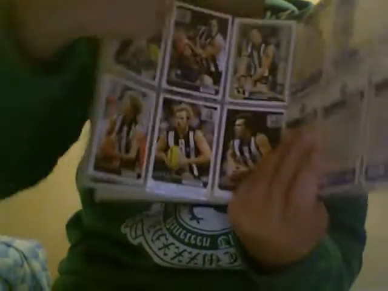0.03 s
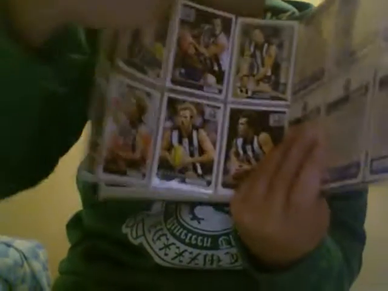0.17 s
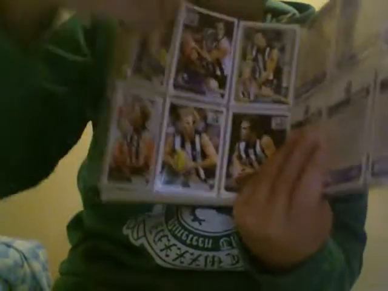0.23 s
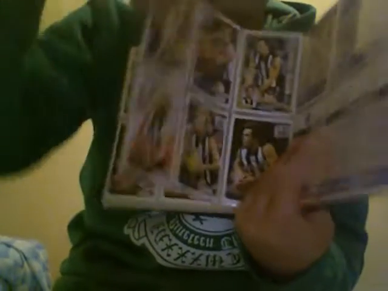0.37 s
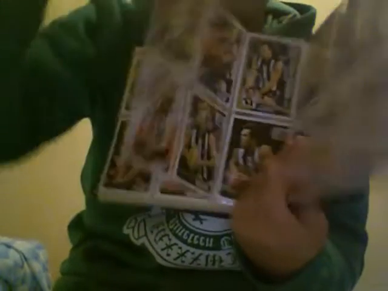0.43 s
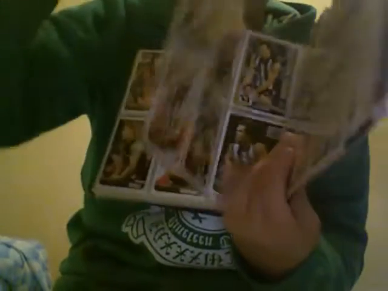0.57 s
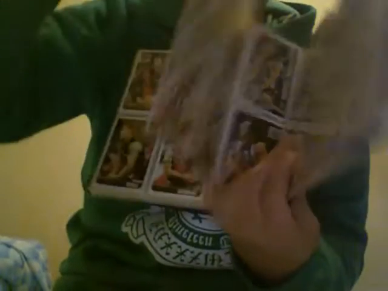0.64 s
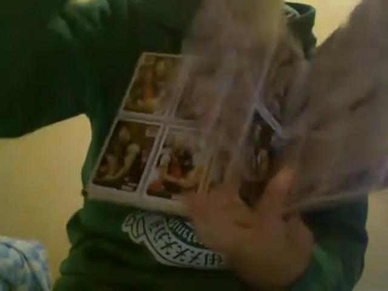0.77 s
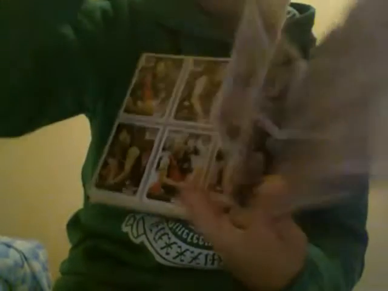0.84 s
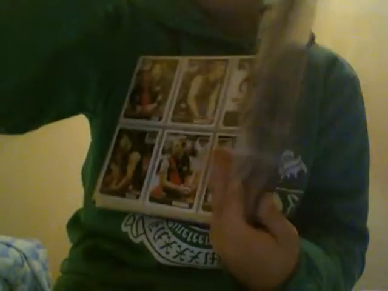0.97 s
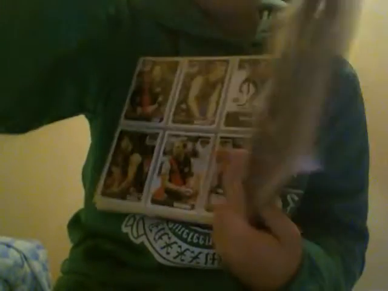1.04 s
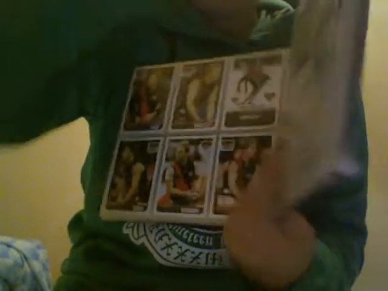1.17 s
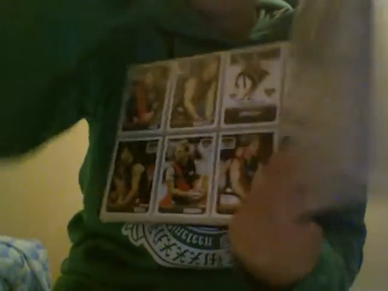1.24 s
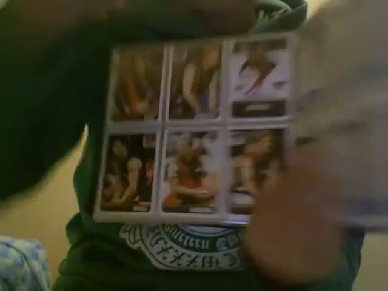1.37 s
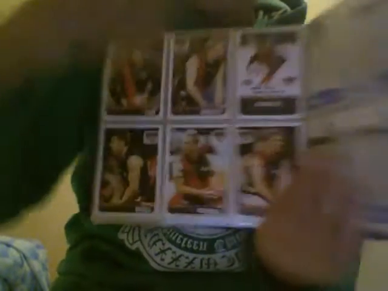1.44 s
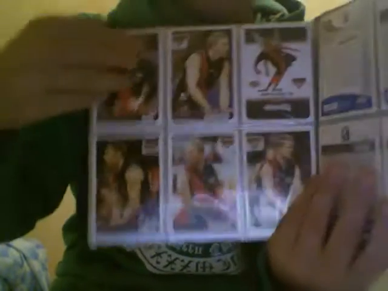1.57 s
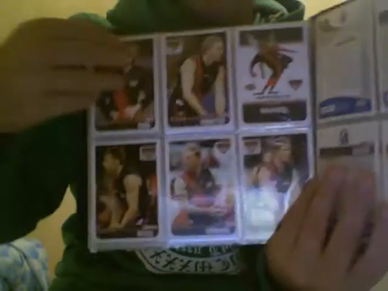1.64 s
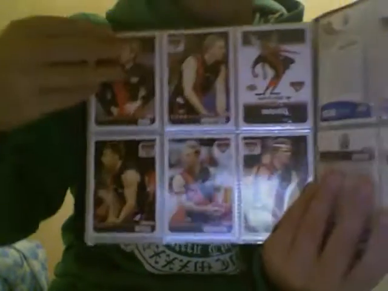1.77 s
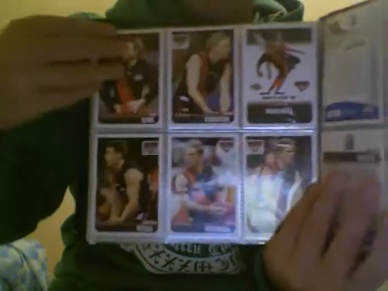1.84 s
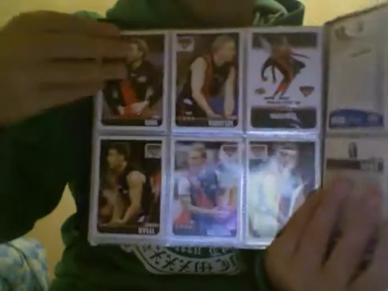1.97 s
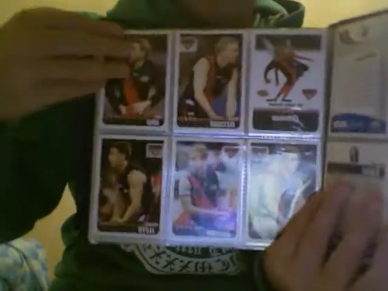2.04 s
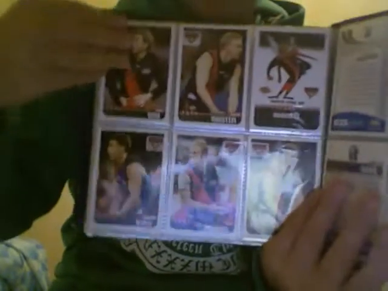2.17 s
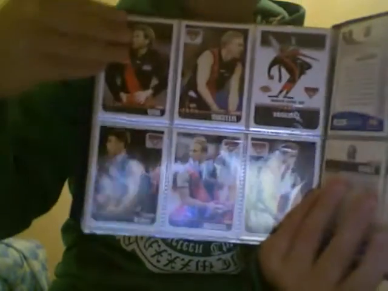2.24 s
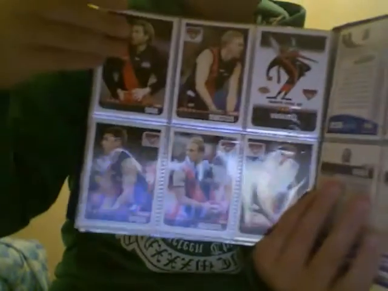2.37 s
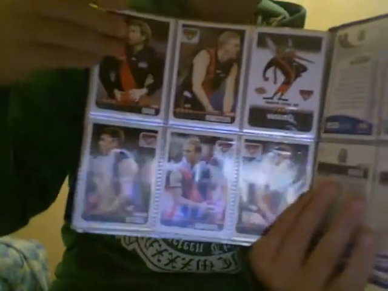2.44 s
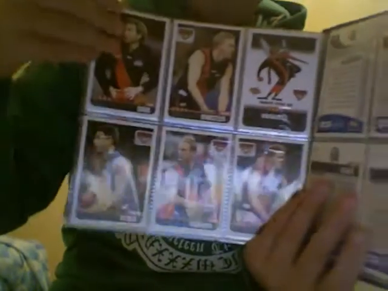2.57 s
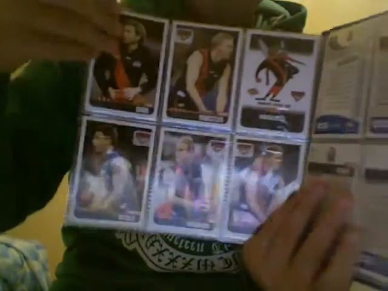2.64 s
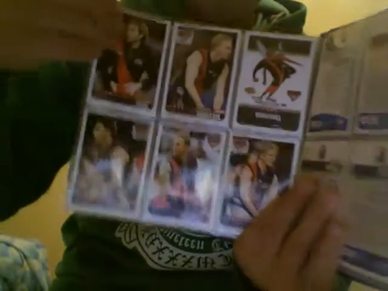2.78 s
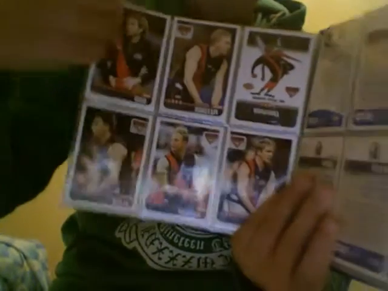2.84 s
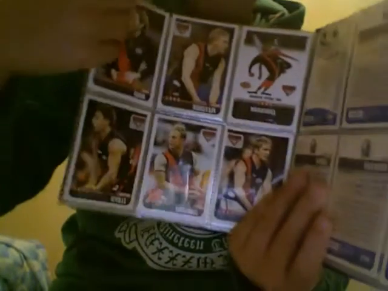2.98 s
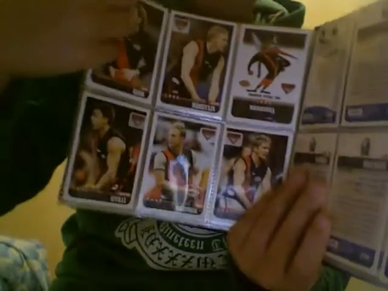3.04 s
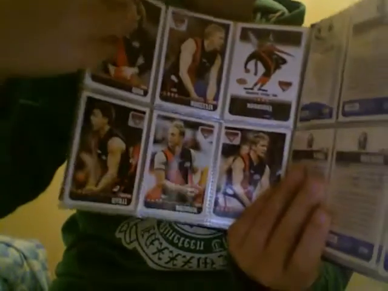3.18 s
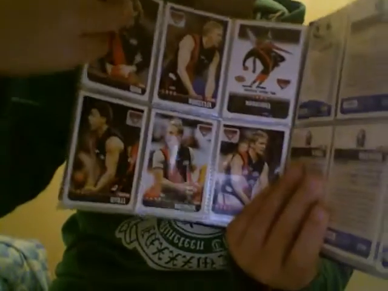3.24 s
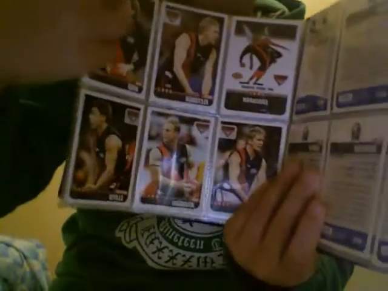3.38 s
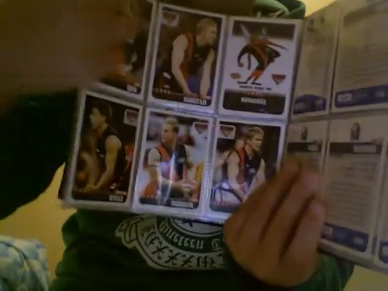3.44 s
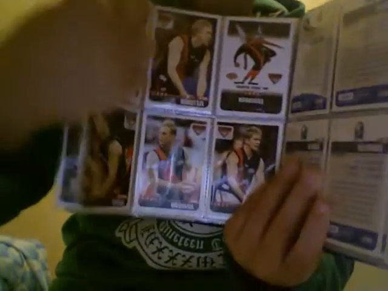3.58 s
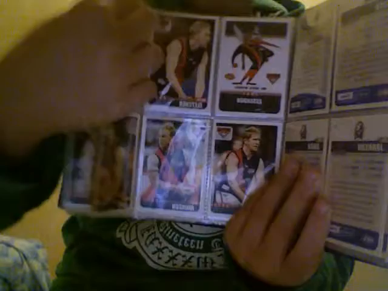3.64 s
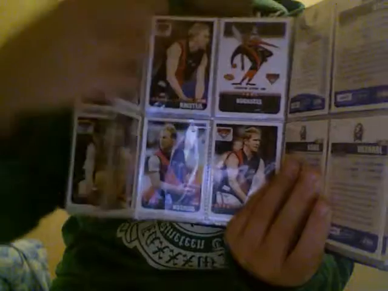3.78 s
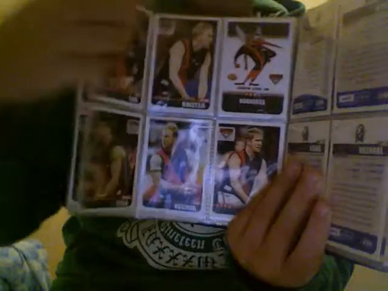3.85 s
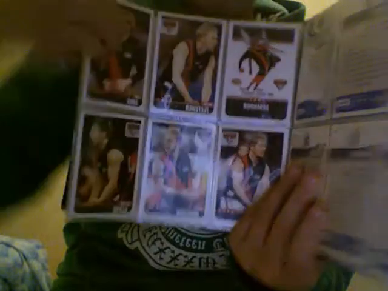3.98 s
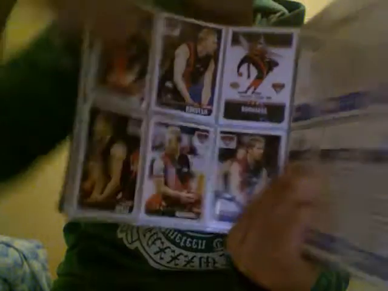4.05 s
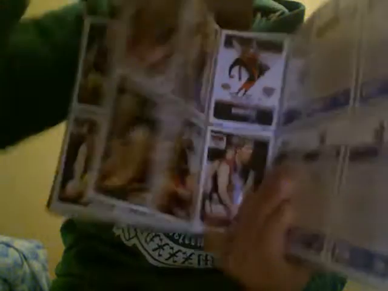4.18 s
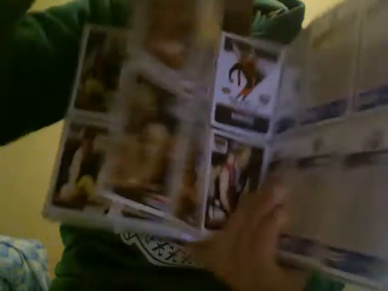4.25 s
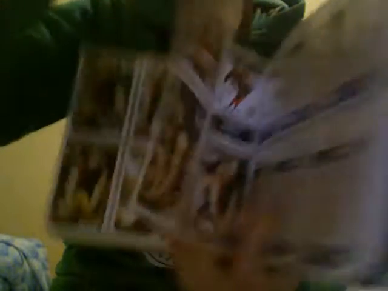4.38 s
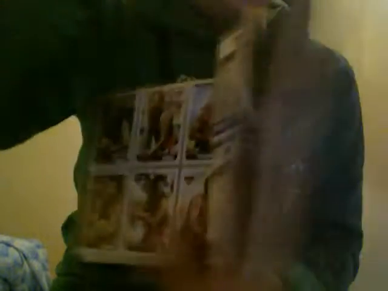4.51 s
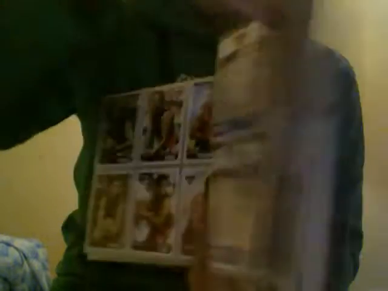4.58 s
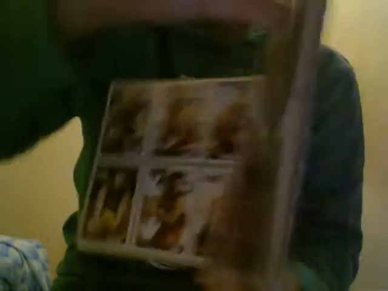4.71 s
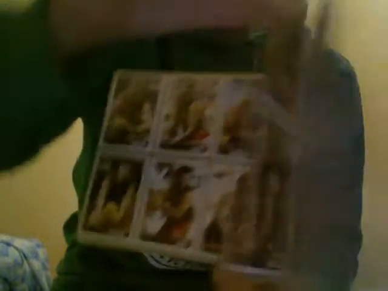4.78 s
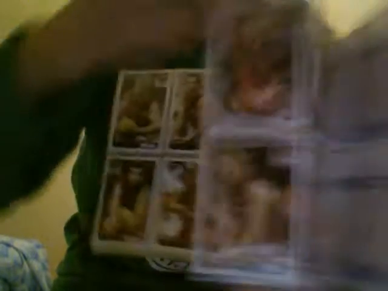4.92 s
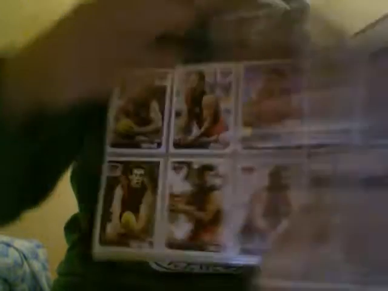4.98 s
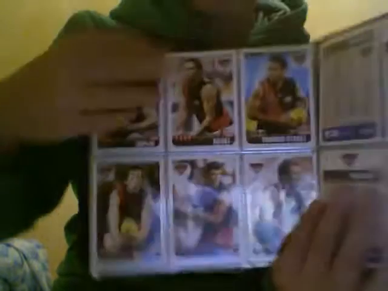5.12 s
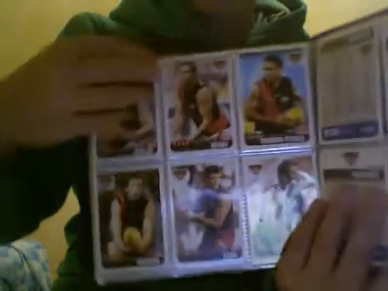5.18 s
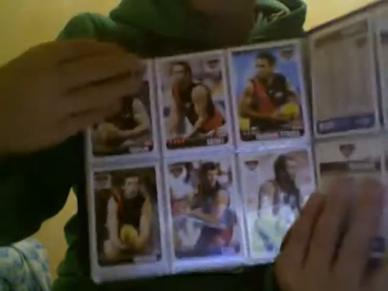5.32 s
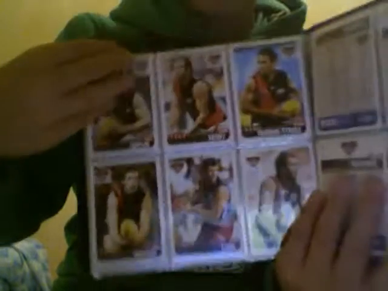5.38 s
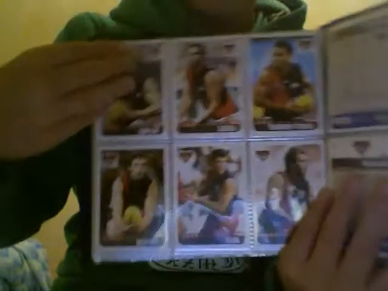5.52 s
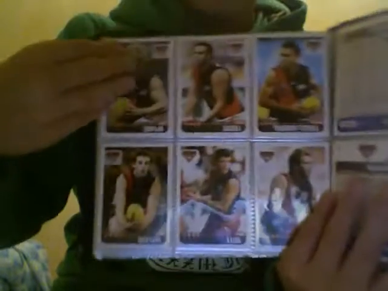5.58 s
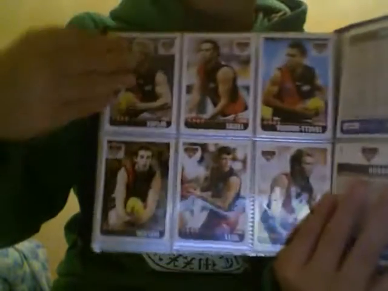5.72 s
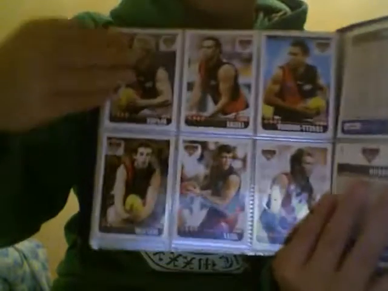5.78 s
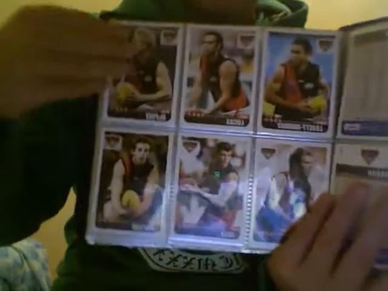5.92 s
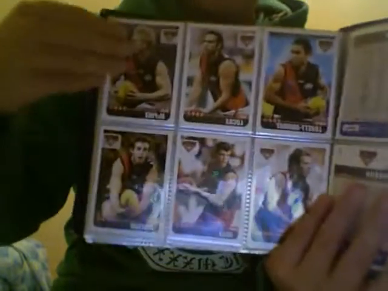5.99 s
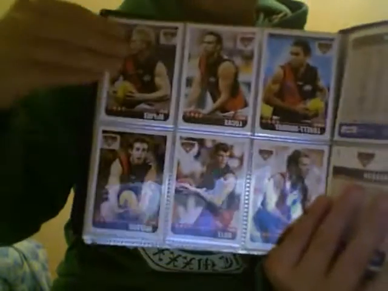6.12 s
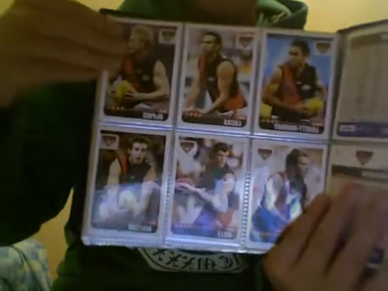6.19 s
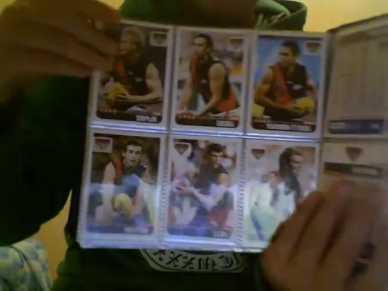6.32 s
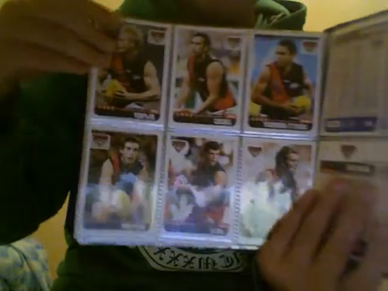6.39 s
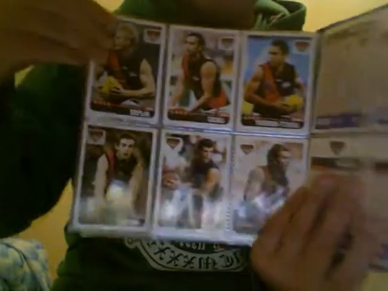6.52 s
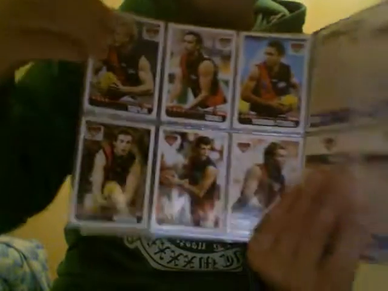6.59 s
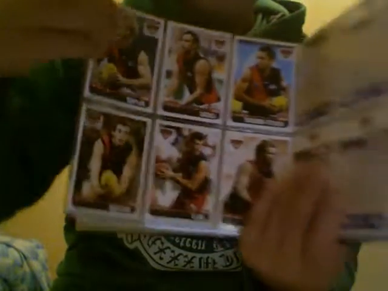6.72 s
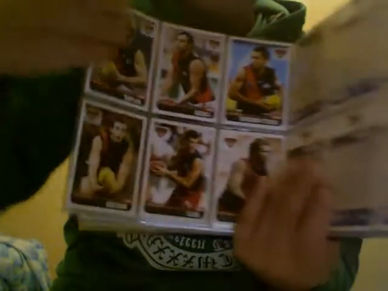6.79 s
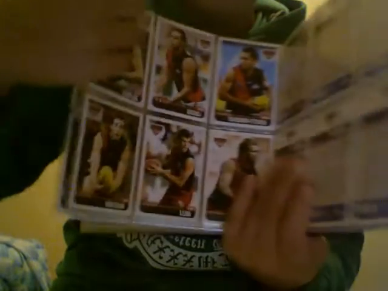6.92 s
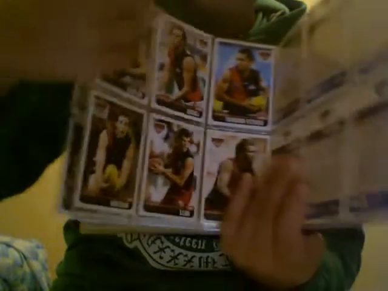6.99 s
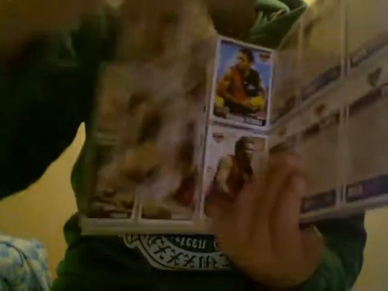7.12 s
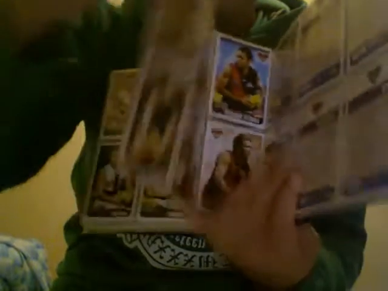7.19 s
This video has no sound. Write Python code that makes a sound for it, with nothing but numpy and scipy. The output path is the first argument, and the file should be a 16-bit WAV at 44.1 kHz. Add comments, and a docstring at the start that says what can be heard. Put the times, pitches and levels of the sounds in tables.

```python
"""Plastic sleeve pages of a card album are lifted and turned close to a small mono camera in a quiet room.
The stiff film snaps as it buckles and crackles as it rubs; swinging pages push air, a hand nudges the album.
Traffic drones far outside from halfway on. Under it all lie room rumble, microphone hiss
and a thin whine from the camera's electronics that pulses with every picture."""
import sys
import numpy as np
from scipy import signal
from scipy.fft import rfft, irfft, next_fast_len
from scipy.io import wavfile
from scipy.ndimage import uniform_filter1d

SR = 44100
rng = np.random.default_rng(int(sys.argv[2]) if len(sys.argv) > 2 else 0)


def to_wav(sig):
    """Store sig (one row per channel, or 1-D mono) as 16-bit WAV at the path in sys.argv[1].

    Samples outside -1..1 are clipped; the rate is SR.
    """
    pcm = np.clip(np.atleast_2d(sig), -1, 1) * 32767
    pcm = np.round(pcm).astype(np.int16)
    wavfile.write(sys.argv[1], SR, pcm.T)  # frames by channels


N = 319711


def gain_of(db):
    """Decibels to an amplitude factor."""
    return 10 ** (np.asarray(db) / 20)


def unit_rms(x):
    """Scales x to rms 1."""
    return x / np.sqrt(np.mean(x ** 2) + 1e-20)


def coloured(x, spectrum):
    """Filters x by a curve of (Hz, dB) points; rms 1."""
    size = next_fast_len(len(x))
    bin_hz = np.fft.rfftfreq(size, 1 / SR)
    hz, db = np.transpose(spectrum)
    curve = gain_of(np.interp(np.log(bin_hz + 1), np.log(hz), db))
    return unit_rms(irfft(rfft(x, size) * curve, size)[:len(x)])


def resonate(x, hz, width_hz):
    """A resonance passed twice for steep skirts; rms 1."""
    r = np.exp(-np.pi * width_hz / SR)
    stage = [1, 0, -1, 1, -2 * r * np.cos(2 * np.pi * hz / SR), r * r]
    return unit_rms(signal.sosfilt([stage, stage], x))


def wander(corner_hz):
    """Low-passed random drift; rms 1."""
    pole = np.exp(-2 * np.pi * corner_hz / SR)
    return unit_rms(signal.lfilter([1], [1, -pole], rng.standard_normal(N)))


# Noise floor spectrum. Each row: frequency in Hz, relative density in dB.
FLOOR_SPECTRUM = [(15, -11), (30, -24.5), (50, -11), (105, 0), (200, -6.5), (400, -10.5), (950, -17.5),
                  (1550, -20.5), (3000, -22), (6900, -27.5), (9000, -27), (12000, -27.5), (14000, -28.5),
                  (15700, -37), (16000, -65)]


def noise_floor(level_db=-52):
    """Steady room rumble and microphone hiss."""
    return gain_of(level_db) * coloured(rng.standard_normal(N), FLOOR_SPECTRUM)


# Clock tones. Each row: frequency in Hz, level while on in dB, 1 if the phase restarts with each picture.
CLOCK_TONES = [(8000, -54.5, 0), (11052.6, -69, 0), (15243, -68, 1)]


def camera_whine(pictures_per_s=14.978, readout_s=0.0315, start_s=-0.0022):
    """Clock tones leak in while the sensor reads out each picture."""
    t = np.arange(N) / SR
    since_s = (t - start_s) % (1 / pictures_per_s)
    gate = uniform_filter1d(1. * (since_s < readout_s), size=40)
    tones = sum(gain_of(db) * np.cos(2 * np.pi * hz * (since_s if restarts else t))
                for hz, db, restarts in CLOCK_TONES)
    return gate * np.sqrt(2) * tones


# Buckles of the film. Each row: start in seconds, relative level in dB, ring in Hz,
# thud and crack in dB against that level, time to fall 60 dB in ms.
BUCKLES = [(0.0314, -16.5, 2820, -14, -22, 6), (0.063, -26.5, 2500, -16, -15, 6.7),
           (0.0915, -23.5, 1410, -9, -26, 13), (0.0996, -24, 1510, -29, -25, 7),
           (0.122, -31, 2650, -2, -2, 6.2), (0.2623, -16, 1420, -13.5, -15, 8.1),
           (0.3232, -17, 4650, -14, -4, 3.3), (0.3303, -12, 4770, -13, -5, 11),
           (0.347, -26.5, 910, 1, -1, 17), (0.362, -29, 4930, -1, 1, 3), (0.378, -28, 1220, -5, -11, 8),
           (0.4018, -20, 2650, -5.5, 1, 2), (0.47, -19.5, 1780, -16, -32, 14),
           (0.5572, -21.5, 1730, -5, -21, 8.8), (0.5714, -24.5, 1530, -15, -25, 6.4),
           (0.6686, -21.5, 6290, -16, -11, 13), (0.68, -9, 3560, -15.5, -16, 6.1),
           (0.759, -24.5, 5000, -24, 3, 18), (0.767, -21, 2140, -17, -21, 2.8),
           (0.7743, -18, 1780, -14, -22, 6), (0.7965, -14, 3450, -18, -23, 9.5),
           (0.9107, -21, 1470, -16, -10, 9), (0.9218, -24, 3430, -4.5, -6, 21),
           (0.967, -23.5, 1750, -7, -17, 18), (1.0252, -13, 3050, -15, -12, 5),
           (1.027, -14.5, 2390, -8.5, -8, 11), (1.0351, -14, 1240, -7, -15, 5.2),
           (1.043, -14, 1060, -23, -9, 9.9), (1.052, -12, 2140, -12, -12, 8.9),
           (1.1512, -30.5, 4370, -13, 0, 7), (1.444, -30, 1590, -16, -8, 7),
           (1.5224, -26.5, 3100, -2.5, -14, 22), (2.4102, -25.5, 6500, -25, -8, 2.7),
           (2.43, -21, 3400, -8, -19, 7), (2.461, -31, 3700, -18, -13, 7.2),
           (2.657, -31, 3250, -0.5, -17, 4.5), (2.728, -25, 1550, -8, -13, 5),
           (2.734, -21, 2570, -27, -20, 5.7), (2.7435, -35, 1400, -14, -9, 6),
           (2.7544, -12.5, 573, -13, -20, 19), (2.7556, -16, 1380, -14, -18, 11),
           (2.7662, -22.5, 3120, -17, 1, 23), (2.9614, -16, 3200, -16.5, 0, 6.1),
           (3.4982, -26.5, 6360, -5, 2.5, 6), (3.6045, -17.5, 3500, -13, -29, 9),
           (3.6115, -18, 1390, -25, -29, 4.6), (3.6855, -19.5, 4960, -21, -9.5, 7.5),
           (3.6914, -21, 1410, -11, -24, 5), (4.0163, -17, 1600, -14, -16, 8),
           (4.0423, -25, 3730, -17, -16, 10), (4.0596, -20.5, 1470, -16, -21, 17),
           (4.0651, -7.5, 1580, -22.5, -8.5, 1.3), (4.0962, -28, 1400, -13, -17, 6),
           (4.1026, -27, 1420, -22, -24, 5), (4.123, -23, 3450, -22, -22, 12),
           (4.191, -5.5, 5650, -34, -15, 4.5), (4.2021, 0, 4900, -26, -13.5, 4.8),
           (4.2095, -20, 1970, -12, -14, 3), (4.2167, -9.5, 3290, -18, -26, 3.5),
           (4.2767, -25, 3380, -19, -18, 11), (4.2915, -17.5, 1453, -15, -8, 8.1),
           (4.315, -17.5, 6000, -23, -7, 2.1), (4.38, -27.5, 1740, 5.5, -16, 5.9),
           (4.4054, -17, 1900, -5, 2, 13), (4.4154, -17.5, 4870, -7.5, -6, 14),
           (4.435, -21, 2950, -11, -19, 6.7), (4.5022, -29, 2110, -1, -11, 7),
           (4.5093, -16, 4700, -5, -6.5, 3), (4.518, -23.5, 1010, -8, -7, 14.5),
           (4.5835, -23, 1145, 6.5, -15, 4.4), (4.5871, -10.5, 4900, -13, -17, 3.6),
           (4.5953, -18, 1140, -11, -16, 4.8), (4.611, -16, 4230, -12, -5, 3.1),
           (4.6193, -16, 1900, -11, -19, 7), (4.7054, -11.5, 5300, -15.5, -8, 5.8),
           (4.7259, -23, 2020, -8, -11, 13), (4.861, -26, 1170, -2, -26, 7),
           (4.9122, -31.5, 3810, 1, -7, 10), (4.939, -32.5, 6520, -20, 8.5, 18),
           (4.9898, -30, 2630, -15, -2, 3), (5.0447, -30, 3600, -12, -17, 5),
           (5.066, -20, 3600, -14, -23, 9.8), (5.0803, -22.5, 1520, -8, -14, 7.1),
           (5.561, -26, 3660, -29, -8, 3.4), (5.5672, -29, 1550, -6, 1.5, 12),
           (6.519, -25.5, 1480, -17, -26, 3.4), (6.5806, -28, 3350, -14, -16, 3),
           (6.5913, -17, 1470, -33, -6, 8.3), (6.618, -27, 2250, -23, -11, 3.7),
           (6.6769, -23, 1240, -10, -7, 11), (6.692, -24, 3270, -7, -19, 6.6),
           (6.714, -20.5, 1840, -10, -25, 5.6), (6.7323, -30, 1365, -12, -22, 10),
           (6.7641, -34, 2650, -4, -11, 14), (6.7975, -35, 1980, -8, -18, 4.5),
           (6.846, -21.5, 4340, -12, -9, 8.2), (6.978, -27.5, 1730, -5, -28, 10),
           (7.048, -28, 2720, -5, -15, 13.4), (7.0954, -10, 1290, -20, 0.5, 4.1),
           (7.1365, -4, 4200, -22.5, -16, 7.4), (7.1429, -21, 905, -8, -25, 18),
           (7.1694, -14.5, 4950, -10, -6, 6), (7.178, -31, 2020, -11, -18, 8),
           (7.1993, -16.5, 2190, -7, -22, 5.6)]


def film_snaps(rise_s=0.00022, ring_share=0.54, thud_stretch=3, tail_db=-18, tail_t60_s=0.26):
    """A burst of tiny fractures rings the film; the page's low thud dies slower than the crack."""
    out = np.zeros(N + SR)
    t = np.arange(1600) / SR
    for start_s, db, ring_hz, thud_db, crack_db, t60_ms in BUCKLES:
        noise = rng.standard_normal((4, len(t)))
        attack = np.minimum(t / rise_s, 1) ** 2
        envelope = attack * gain_of(-60 * np.maximum(t - rise_s, 0) / (t60_ms / 1000))
        ring = resonate(envelope * noise[0], ring_hz, width_hz=0.45 * ring_hz)
        flex = resonate(envelope * noise[1], hz=1840, width_hz=5340)
        thud = resonate(envelope ** (1 / thud_stretch) * noise[2], hz=374, width_hz=900)
        crack = resonate(envelope * noise[3], hz=8650, width_hz=9700)
        body = ring_share * ring + (1 - ring_share) * flex
        snap = body + gain_of(thud_db) * thud + gain_of(crack_db) * crack
        at = round(start_s * SR)
        out[at:at + len(t)] += 2 * gain_of(db) * snap / np.sqrt(len(t))
    # Nearby surfaces return a short tail.
    lag = np.arange(3000)
    room = rng.standard_normal(len(lag)) * gain_of(-60 * lag / SR / tail_t60_s) * (lag > 90)
    tail = signal.oaconvolve(out, room / np.linalg.norm(room))
    return out[:N] + gain_of(tail_db) * tail[:N]


# Slides of film on film. Each row: peak time in seconds, length in ms, level in dB,
# brightness in dB, extra sleeve buzz in dB.
SLIDES = [(0.037, 14, -47, -3, 2), (0.101, 6.8, -46, -5, -1), (0.17, 65, -56.5, 3.5, -2.5),
          (0.327, 7, -46.5, 8, 3.5), (0.36, 11, -45.5, -2, 3.5), (0.398, 8.9, -45, -1, -13),
          (0.59, 17, -47, -2, -6), (0.628, 14.5, -38.5, -1, 4), (0.78, 22, -50, 0, 2),
          (0.929, 10, -49, -1, 4), (0.985, 22, -54, 1, -4), (1.036, 20.5, -45, 0, 1),
          (1.527, 4.7, -56, 2, 4), (2.587, 75, -57, 0, 2), (2.759, 5.9, -39.5, -5, -10),
          (3.506, 11, -49.5, 0, -3), (3.85, 120, -65, 4, 4.5), (4.02, 15, -50, 3, 2),
          (4.126, 28, -60.5, 1, 10), (4.171, 21, -49, -3, 2.5), (4.21, 16, -46, -3, 2.5),
          (4.291, 8.8, -46, 1, -4), (4.369, 25, -46, 0, -2), (4.407, 7.1, -38, 4, 1),
          (4.44, 13, -53, -7, 3), (4.515, 6.8, -45, -2, 3), (4.591, 12, -39.5, -3.5, -1),
          (4.635, 25, -51.5, 4, 7), (4.714, 40, -51.5, -3.5, 2.5), (4.937, 19, -54, -4, 7),
          (5.075, 25, -52, -3, 4), (5.566, 22, -53.5, 1, 2.5), (6.51, 56, -53.5, -2.5, -3),
          (6.592, 13, -47, -1, -2.5), (6.678, 34.6, -56, -3, -4), (6.765, 58, -54.5, -1.5, -1.5),
          (7.055, 31, -58, 5, 2), (7.172, 8.1, -43, -4, 5), (7.198, 13, -43, 0, -2)]
# Spectra of a slide's three voices. Each row: frequency in Hz, relative density in dB.
FLEX_SPECTRUM = [(250, -14), (600, -7), (1000, -0.5), (1400, 4), (2200, 0.5), (3200, -4), (6000, -38)]
BUZZ_SPECTRUM = [(1500, -17), (2600, -4.5), (3800, -2.5), (5500, -4), (7500, -5), (10000, -29)]
SURFACE_SPECTRUM = [(4000, -20), (7500, -1), (9500, 5.5), (12500, 7), (15500, 1.5), (17000, -52)]


def film_rustle(grains_per_s=3000, scatter_db=3, swish_gain=1.8, clump_db=4.5, fall_stretch=1.18,
                shiver_ms=4.5, shiver_db=-42, shiver_bright_db=-3):
    """Film slides on film: clumped, uneven clicks over a swish. Each snap also sets off a brief shiver."""
    t = np.arange(N) / SR
    coarse_t = t[::32]
    shivers = [(start_s, shiver_ms, db + shiver_db, shiver_bright_db, 0) for start_s, db, *_ in BUCKLES]
    power = 0
    for peak_s, length_ms, db, bright_db, buzz_db in SLIDES + shivers:
        away_s = np.where(coarse_t < peak_s, peak_s - coarse_t, (coarse_t - peak_s) / fall_stretch)
        drop_db = 9.57 * np.minimum(away_s * 1000 / length_ms, 20) ** 0.6
        voices_db = db + np.array([[-bright_db], [buzz_db], [bright_db]])  # flex, buzz, surface
        power = power + gain_of(voices_db - drop_db) ** 2
    out = np.zeros(N)
    for spectrum, envelope in zip((FLEX_SPECTRUM, BUZZ_SPECTRUM, SURFACE_SPECTRUM), np.sqrt(power)):
        sizes = gain_of(scatter_db * np.minimum(rng.exponential(1, N), 4)) * rng.standard_normal(N)
        grains = unit_rms(sizes * (rng.random(N) < grains_per_s / SR))
        clumps = gain_of(clump_db * wander(corner_hz=43))
        swish = swish_gain * rng.standard_normal(N)
        out += coloured(clumps * (grains + swish), spectrum) * np.interp(t, coarse_t, envelope)
    return out


# Swells of moving air. Each row: peak time in seconds, 1/e half-width in seconds, level in dB.
WAFTS = [(0.17, 0.22, -60), (1.28, 0.16, -61)]


def page_wafts():
    """A swinging page pushes air at the microphone: a deep, soft swell."""
    t = np.arange(N) / SR
    envelope = sum(gain_of(db) * np.exp(-((t - peak_s) / width_s) ** 2) for peak_s, width_s, db in WAFTS)
    return envelope * resonate(rng.standard_normal(N), hz=45, width_hz=40)


def album_bump(start_s=3.0585, decay_ms=1, gain_db=-35):
    """A hand nudges the album: one soft, low push and its rebound."""
    age = np.clip((np.arange(N) / SR - start_s) * 1000 / decay_ms, 0, 60)
    pulse = 4 * age * (1 - age / 2) * np.exp(-age)
    return gain_of(gain_db) * pulse


# A vehicle passing outside. Each row: time in seconds, pitch in Hz, level in dB.
ENGINE_PATH = [(3.5, 90.9, -68), (3.7, 90.2, -56), (4.0, 92.4, -57.5), (4.45, 96.2, -51), (4.85, 95.1, -51),
               (5.1, 94.9, -45), (5.35, 92, -52), (5.8, 92.5, -45.5), (6.0, 92.1, -53), (6.12, 92.7, -48.5),
               (6.38, 93.3, -63), (6.8, 92, -60), (7.25, 93.7, -58.5)]
# Engine partials. Each row: multiple of the pitch, relative level in dB.
ENGINE_ORDERS = [(1, 0.5), (1.41, -15.5), (2, -14.5), (2.85, -18.5)]


def traffic(wander_hz=0.66, wander_db=0.3):
    """A low engine note, blurred by distance, swells as it passes."""
    t = np.arange(N) / SR
    times_s, hz, db = np.transpose(ENGINE_PATH)
    pitch_hz = np.interp(t, times_s, hz) + wander_hz * wander(corner_hz=4.8)
    cycles = np.cumsum(pitch_hz) / SR
    note = sum(gain_of(order_db) * np.sqrt(2) * np.cos(2 * np.pi * order * cycles)
               for order, order_db in ENGINE_ORDERS)
    drift_db = wander_db * uniform_filter1d(wander(corner_hz=3.4), size=2000)
    return note * gain_of(np.interp(t, times_s, db, left=-120) + drift_db)


def scene():
    """One microphone feeds both channels."""
    floor = noise_floor()
    album = film_snaps() + film_rustle() + album_bump() + page_wafts()
    mono = album + traffic() + floor + camera_whine()
    return np.array([mono, mono])


def record(dry, waver_db=-41, cutoff_hz=16700):
    """The channels waver very slightly against each other; a steep low-pass limits the band."""
    waver = gain_of(waver_db) * wander(corner_hz=360)
    wavering = dry * np.array([1 + waver, 1 - waver])
    lowpass = signal.firwin(511, cutoff_hz, window=("kaiser", 9), fs=SR)
    return signal.oaconvolve(wavering, lowpass[None], "same")


dry = scene()
out = record(dry)
to_wav(out)
```